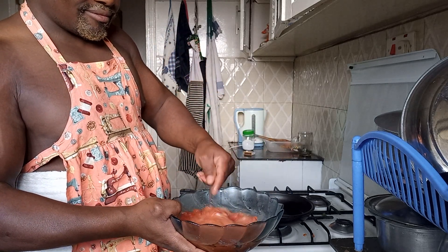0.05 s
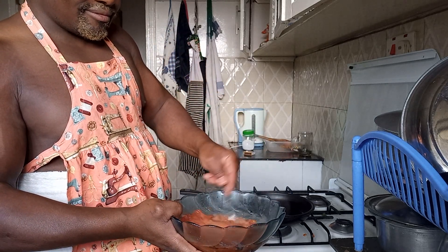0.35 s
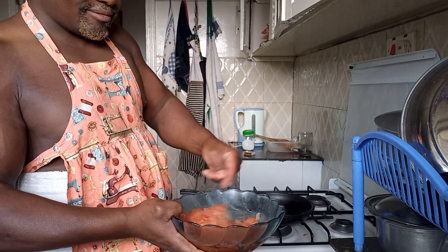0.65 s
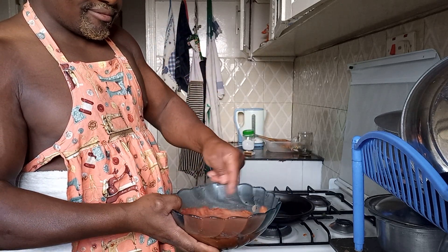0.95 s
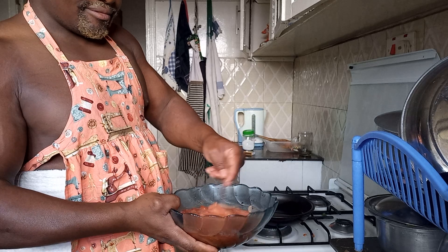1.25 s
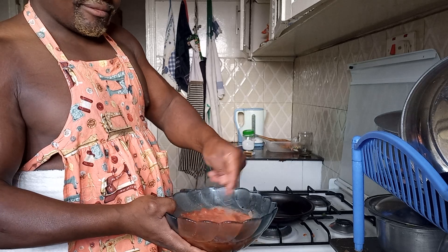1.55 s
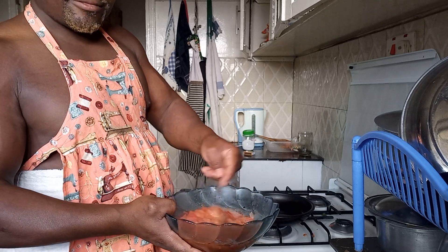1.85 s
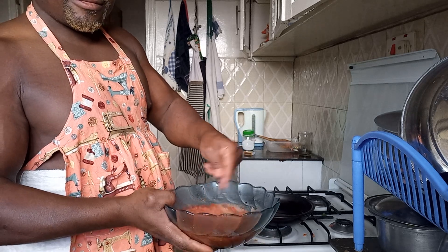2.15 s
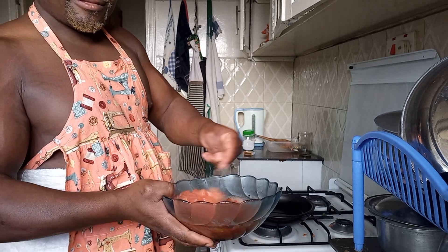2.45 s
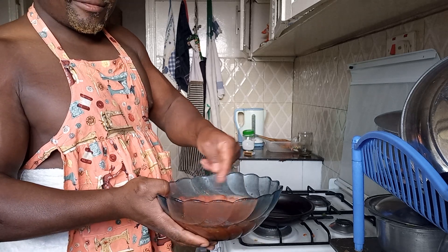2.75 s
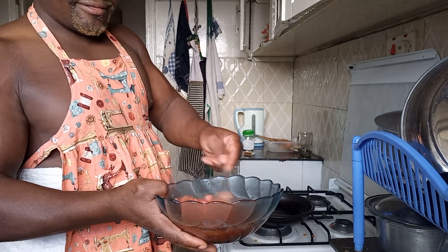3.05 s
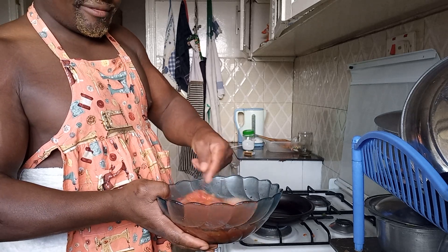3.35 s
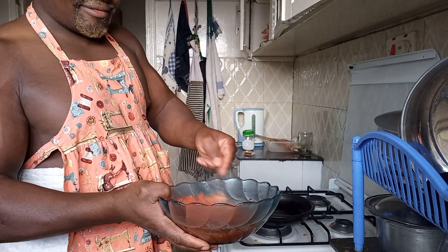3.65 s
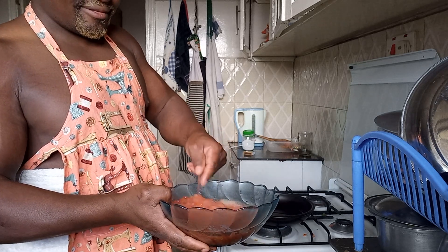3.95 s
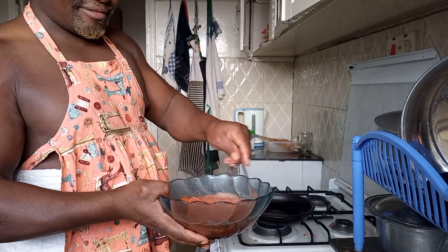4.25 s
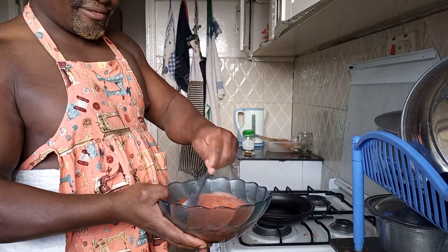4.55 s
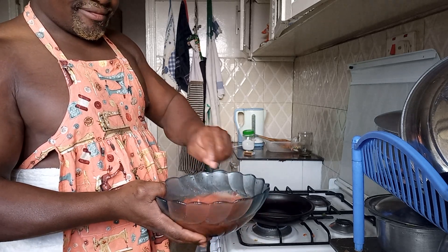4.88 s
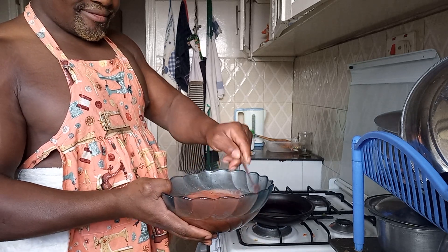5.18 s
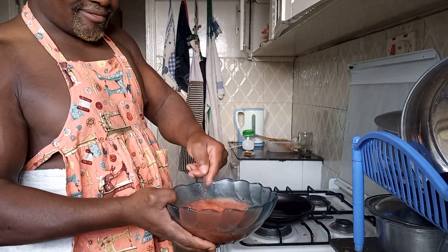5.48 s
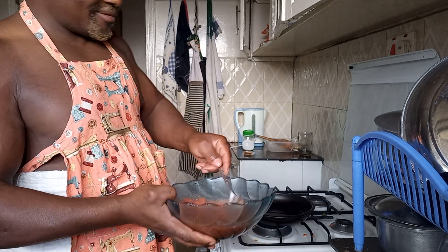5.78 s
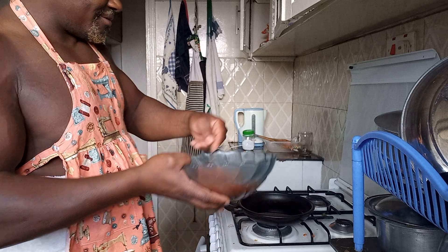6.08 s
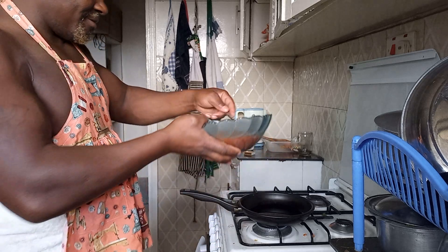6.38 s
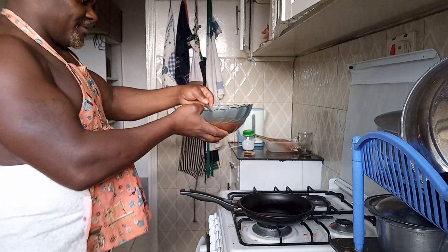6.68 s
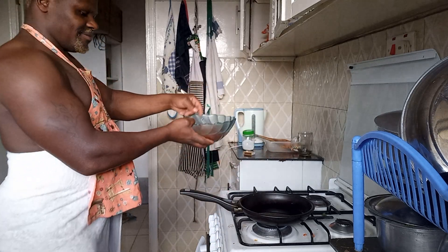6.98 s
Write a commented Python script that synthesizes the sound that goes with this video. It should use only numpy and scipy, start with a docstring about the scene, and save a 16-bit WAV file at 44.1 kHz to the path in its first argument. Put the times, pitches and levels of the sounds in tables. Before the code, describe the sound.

Quick, rhythmic squelches and hollow plops come from eggs and tomato being whisked in a glass bowl a short distance from the microphone. Small bubbles pop between strokes and the metal utensil now and then ticks against the glass. A little past halfway the whisking gives way to a soft bump, one bright clink and some gentle, irregular stirring. The small kitchen adds a short echo and a faint hum.

```python
"""A small tiled kitchen with a faint hum; a stereo microphone a little way from a hand-held glass bowl.
From the start a steel utensil beats eggs and chopped tomato, about five strokes a second. Each stroke
swishes through the egg and slaps an air pocket shut; bubbles pop after it, and now and then steel
clinks on glass. After four seconds the beating stops, there is a soft low bump and a bright clink,
and a few slower stirs follow. The tiles answer throughout."""
import sys
import numpy as np
from scipy import signal
from scipy.fft import rfft, irfft, next_fast_len
from scipy.io import wavfile

SR = 44100
rng = np.random.default_rng(int(sys.argv[2]) if len(sys.argv) > 2 else 0)


def waveform_to_disk(signal):
    """Save audio, clipped to [-1, 1], as 16-bit WAV at the path in sys.argv[1]."""
    frames = np.transpose(np.atleast_2d(signal))
    scaled = np.clip(frames, -1, 1) * 32767
    samples = np.round(scaled).astype(np.int16)
    wavfile.write(sys.argv[1], SR, samples)


N = 314256
LENGTH = 16384  # samples in one short sound with its room tail
T, HZ = np.arange(LENGTH) / SR, np.fft.rfftfreq(LENGTH, 1 / SR)
BEATING_ENDS_S = 4.2

# Strokes through the egg. Each row: start in seconds, plop level in dB, air pocket pitch and width in Hz,
# squelch pitch in Hz, squelch in dB over the smack, smack level in dB, spray level in dB.
STROKES = [(0.0, -45.5, 855, 450, 1940, -13, -53, -59), (0.11, -44, 590, 313, 6300, -6, -48, -52),
           (0.29, -32, 890, 396, 1990, -7, -39, -43), (0.463, -34, 1110, 420, 2420, -30, -47.5, -47),
           (0.65, -45, 905, 560, 4930, -12, -44.5, -47), (0.853, -39.5, 710, 132, 2340, 2, -45, -52.5),
           (1.053, -47, 850, 157, 4340, -6, -55, -59), (1.419, -44, 804, 210, 6160, -4.5, -52.5, -55.5),
           (1.651, -40.5, 547, 180, 1950, -5.5, -44, -47), (1.849, -33.5, 834, 290, 4080, -3, -49, -55),
           (2.045, -30, 724, 250, 6300, -5, -45, -48), (2.258, -38.5, 823, 129, 2390, 3, -48, -54.5),
           (2.438, -28.5, 710, 90, 3090, -21, -42.5, -45), (2.654, -40.5, 766, 218, 2870, -5, -53, -54),
           (2.838, -39, 802, 260, 3050, -3, -45.5, -52.5), (3.027, -40, 935, 218, 2400, -16, -49.5, -56),
           (3.214, -35.5, 1020, 290, 2370, -3.5, -45, -51), (3.412, -36, 1010, 237, 5170, -18, -45, -50),
           (3.61, -34, 875, 175, 2830, -6, -48, -57), (3.822, -46.5, 825, 253, 3610, -28, -53.5, -63.5),
           (4.007, -37, 823, 169, 2120, -26, -48, -56), (4.988, -46, 762, 458, 6200, -8.5, -48, -53),
           (5.49, -51.5, 610, 513, 2340, -20, -59.5, -64.5),
           (5.554, -45.5, 700, 230, 2420, -4.5, -51, -56.5), (5.924, -45.5, 810, 473, 3030, 4, -51, -54),
           (6.107, -49, 870, 440, 6800, -4.5, -54, -60.5),
           (6.523, -50.5, 740, 505, 4880, -13, -51.5, -52.5),
           (6.728, -53.5, 730, 330, 6000, -17, -60.5, -82),
           (6.898, -54.5, 1030, 450, 5900, -5, -45.5, -46.5), (6.926, -44.5, 930, 170, 5950, -20, -46, -54)]
# Tone of the wet smack and of the fine spray. Each row: frequency in Hz, gain in dB.
SMACK_COLOUR = [(900, -14.5), (1500, 3.5), (2200, -0.5), (3300, -3.5), (5500, -1), (7000, -9.5),
                (9000, -22)]
SPRAY_COLOUR = [(5000, -33.5), (7000, -5), (9000, -5), (12000, -1.5), (14500, -4.5), (16000, -11.5)]


def strokes():
    """The utensil cuts into the egg: the wet film squelches and sprays, and an air pocket plops."""
    # Hollow ringing tones of bowl and nearby tiles that colour each plop.
    # Each row: pitch in Hz, width in Hz, gain in dB.
    hollow_tones = [(623.5, 3.2, 8), (712.6, 6.5, 6.5), (872, 52, -4), (1320, 78, -1), (1393, 100, 4)]
    out = np.zeros((2, N))
    smack, spray = causal(SMACK_COLOUR), causal(SPRAY_COLOUR)
    body = causal([(100, -24.5), (250, -10.5), (450, 5.5), (1200, 1.5), (1800, -11.5), (4000, 1),
                   (9000, -34)])
    body *= 1 + sum(amp(db) * resonance(hz, width) for hz, width, db in hollow_tones)
    closing = delay(0.001471)  # the pocket shuts just after the smack
    for s, plop_db, hz, width, squelch_hz, squelch_db, smack_db, spray_db in STROKES:
        slap = closing + 0.5 * crackle(np.exp(-T / 0.0075), rate=760, spread_db=3.5)
        plop = irfft(slap * resonance(hz, width) * body * kitchen(direct_db=-7))
        cut = (1 - np.exp(-T / 0.00088)) * np.exp(-T / 0.005)
        tearing = film(cut, rate=2000, direct_db=-8) + 0.5 * closing * kitchen(direct_db=-4)
        # folds of egg trap a small cavity that colours each smack differently
        squelch = unit(irfft(tearing * resonance(squelch_hz, 0.4 * squelch_hz) ** 2))
        wet = unit(irfft(tearing * smack)) + amp(squelch_db) * squelch
        for sound, db in ((plop, plop_db), (wet, smack_db), (irfft(tearing * spray), spray_db)):
            add(out, s, amp(db) * unit(sound, seconds=0.05))
    return out


def swishes():
    """Dragging tears the egg film in fine crackles: lightly before fast strokes, now and then hard."""
    # Each row: start and length in seconds, smack level in dB, spray level in dB.
    hard_drags = [(0.246, 0.0048, -61, -49.5), (0.426, 0.013, -52, -48), (0.589, .029, -51, -56),
                  (0.981, 0.05, -54, -59.5), (1.168, 0.029, -62, -69), (2.008, 0.023, -63, -52.5),
                  (2.361, 0.051, -56, -81), (2.45, .0033, -48, -66), (2.594, 0.0043, -48.5, -55),
                  (2.78, 0.035, -61.5, -64.5), (3.172, 0.012, -55.5, -56.5), (3.56, 0.024, -43, -46),
                  (3.702, .008, -60, -61.5), (3.765, 0.0092, -54.5, -54.5), (3.946, 0.014, -68.5, -61.5),
                  (4.418, 0.018, -57, -62), (4.465, 0.0075, -61, -51.5), (4.64, 0.015, -67.5, -68),
                  (5.68, 0.061, -65, -71.5), (5.969, 0.056, -58.5, -67), (6.166, .11, -63, -70),
                  (6.467, 0.074, -75, -71), (6.822, 0.046, -55.5, -59.5)]
    out = np.zeros((2, N))
    smack, spray = causal(SMACK_COLOUR), causal(SPRAY_COLOUR)
    lead_s, dip_s = 0.047, 0.036  # the utensil dips in ahead of the stroke
    dips = [(s - lead_s, dip_s, smack_db - 19.5, spray_db - 18.5)
            for s, *_, smack_db, spray_db in STROKES if lead_s < s < BEATING_ENDS_S]
    for s, length, smack_db, spray_db in hard_drags + dips:
        drag = np.exp(-np.maximum(T - length, 0) / 0.0065)
        tearing = film(drag, rate=1200, direct_db=-3, count=2)
        tearing += 0.2 * kitchen(direct_db=-11)  # a tick as the steel bites
        for colour, db in ((smack, smack_db), (spray, spray_db)):
            add(out, s, amp(db) * unit(irfft(tearing * colour), seconds=max(length, 0.008)))
    return out


def film(envelope, rate, direct_db, count=3):
    """Spectrum of egg film tearing at several places, each with its own path to the microphone."""
    tears = (crackle(envelope, rate / count, spread_db=2) * kitchen(direct_db) for _ in range(count))
    return sum(tears) / np.sqrt(count)


def crackle(envelope, rate, spread_db):
    """Spectrum of tiny bursts of uneven size, rate a second, under an envelope."""
    present = rng.random(LENGTH) < rate / SR
    sizes = rng.choice([-1, 1], LENGTH) * amp(spread_db * np.clip(rng.standard_normal(LENGTH), -2, 2))
    bursts = present * sizes * envelope
    return rfft(bursts / (np.linalg.norm(bursts) + 1e-12))


def bubbles():
    """Bubbles and drops ring; froth bursts after each stroke, and fast ones gulp as the furrow closes."""
    # The loudest pops. Each row: start in seconds, relative level in dB, pitch in Hz, life in cycles.
    single_pops = [(0.124, -41, 468, 7.4), (0.302, -39.5, 427, 2.6), (0.5015, -31.5, 870, 2.1),
                   (0.503, -42, 2220, 2.5), (0.548, -43.5, 912, 2.5), (0.602, -40.5, 750, 1),
                   (0.731, -39.5, 844, 9.9), (0.888, -41, 780, 6.6), (0.989, -37.5, 1356, 4.2),
                   (1.13, -49.5, 1290, 3.4), (1.169, -49, 1336, 12), (1.188, -46.5, 500, 7.2),
                   (1.258, -49.5, 1330, 3.5), (1.32, -50, 1350, 4.9), (1.384, -47.5, 522, 4.2),
                   (1.7, -42.5, 910, 1), (1.891, -35, 990, 5.1), (2.064, -25.5, 900, 2.4),
                   (2.453, -37.5, 2990, 2.3), (2.688, -39.5, 860, 2.3), (3.397, -47, 2000, 16),
                   (3.622, -44, 350, 2.6), (3.676, -39, 1090, 0.61), (3.772, -48, 3530, 9.8),
                   (3.807, -50.5, 3130, 5.3), (4.039, -47, 2110, 5.8), (4.071, -46, 1290, 2.7),
                   (4.419, -57.5, 777, 6.9), (5.362, -53, 990, 0.82), (5.73, -45, 619, 8),
                   (6.002, -50, 2850, 3.4), (6.986, -41, 1230, 0.45)]
    out = np.zeros((2, N))
    gulp_hz, gulp_cycles, typical_plop_db = 412, 2.44, -34
    gulps = [(s + 0.016, -50 + 0.17 * (plop_db - typical_plop_db), gulp_hz, gulp_cycles)
             for s, plop_db, *_ in STROKES if s < BEATING_ENDS_S]
    froth_lag_s, froth_hz, froth_cycles = 0.044, 2250, 12
    scatter = rng.uniform(-1, 1, (len(STROKES), 2))
    froth = [(s + froth_lag_s * (1 + wait / 2), smack_db - 9, froth_hz * np.exp(0.57 * pitch),
              froth_cycles) for (s, *_, smack_db, _), (wait, pitch) in zip(STROKES, scatter)]
    for s, db, hz, cycles in single_pops + gulps + froth:
        soft = resonance(hz, 0.97 * hz)  # thick egg rounds off the start of the pop
        pop = irfft(rfft(bubble(T, hz, max(cycles, 1), rise=0.04)) * soft * kitchen(direct_db=-4))
        add(out, s, amp(db - 3.5) * unit(pop, seconds=0.025))
    return out


def bubble(t, hz, cycles, rise):
    """An air pocket rings briefly; its pitch climbs as it nears the surface."""
    age = t * hz / cycles
    glide = 1 + rise * (np.minimum(age, 2) - 1)
    return np.sin(2 * np.pi * hz * t * glide) * np.exp(-2 * age) * (1 - np.exp(-2 * t * hz))


def slosh(count=1100):
    """Many small pockets gurgle as the egg runs back down the glass."""
    # Course of the gurgle. Each row: time in seconds, relative level in dB, typical pitch in Hz.
    gurgle_course = [(0.0, -42.5, 865), (0.22, -58, 470), (0.26, -57, 1010), (0.36, -45, 748),
                     (0.5, -47.5, 954), (0.93, -54, 690), (0.99, -44, 1330), (1.23, -59.5, 585),
                     (1.27, -52, 1020), (1.76, -61, 560), (1.82, -54, 850), (2.5, -51.5, 710),
                     (3.14, -57, 910), (3.67, -45, 910), (4.23, -78, 657), (5.77, -61, 648),
                     (6.23, -73, 880), (6.35, -74, 507), (6.99, -53, 998), (7.13, -63, 693)]
    times, level_db, centre_hz = np.transpose(gurgle_course)
    pops = np.zeros(N)
    scatter = np.clip(rng.standard_normal((count, 3)), -1.6, 1.8)
    for s, (pitch, size, late) in zip(np.linspace(0, N / SR, count), scatter):
        hz = np.interp(s, times, centre_hz) * np.exp(0.33 * pitch)
        add(pops, s + 0.0074 * late, amp(3.4 * size) * bubble(T[:2000], hz, cycles=4, rise=0.036))
    in_room = signal.fftconvolve(pops[None], irfft(kitchen(direct_db=-8)), axes=1)[:, :N]
    return unit(in_room) * amp(np.interp(np.arange(N) / SR, times, level_db) - 5)


def clinks():
    """Steel chatters on the glass; the ring of the utensil builds over the first contacts."""
    # Each row: start in seconds, relative levels of utensil and glass in dB.
    contacts = [(0.294, -53, -50), (0.651, -50, -44.5), (3.414, -47, -46.5), (4.472, -56, -70),
                (5.277, -36, -83), (5.921, -65, -76), (6.837, -53.5, -61)]
    # Ring of utensil and bowl. Each row: pitch in Hz, relative level in dB, seconds to fall 60 dB.
    steel_modes = [(1835, -7.5, 0.15), (1836, -13, .12), (2796, 2, 0.055), (3210, -15, 0.071),
                   (3880, 10.5, 0.02), (4700, -3, 0.055), (6160, 1, 0.094), (6470, 5, 0.029),
                   (6760, 2.5, 0.055), (8700, -3, 0.055), (9050, -6, .06), (10400, -18, 0.072),
                   (11910, -3, 0.11), (14000, 1, 0.047), (14110, 3, .08), (13100, 2.5, 0.062),
                   (14740, -2, .05), (15510, -2, .05)]
    glass_modes = [(3340, -17, 0.031), (3924, -11.5, 0.22), (5200, -3, .06), (5190, 1.5, 0.027),
                   (11420, -13, 0.03)]
    out = np.zeros((2, N))
    bright = causal([(500, -14.5), (1500, -7.5), (2200, -10.5), (3000, -4.5), (6500, -5), (8000, -13.5),
                     (11000, -3), (14300, -4), (16000, -5.5)])
    build = 1 - np.exp(-T / 0.002)
    for s, steel_db, glass_db in contacts:
        room = kitchen(direct_db=-8)
        chatter = crackle(build * np.exp(-T / 0.012), rate=2000, spread_db=4) * bright
        steel = rfft(build * ring(steel_modes))
        glass = rfft(ring(glass_modes))
        for spectrum, db in ((chatter, steel_db - 4.5), (steel, steel_db - 4.5), (glass, glass_db)):
            add(out, s, amp(db) * unit(irfft(spectrum * room), seconds=0.05))
    return out


def ring(modes):
    """Decaying modes, at new strengths for each blow."""
    return sum(amp(db + rng.normal(0, 0.54) - 60 * T / t60) * np.sin(2 * np.pi * hz * T)
               for hz, db, t60 in modes)


def thud():
    """A soft low bump, followed by a short boom."""
    out = np.zeros((2, N))
    bump = irfft(rfft(bubble(T, hz=99, cycles=2.5, rise=0.027)) * kitchen(direct_db=1))
    boom = np.sin(2 * np.pi * 88 * T) * np.exp(-((T - 0.16) / 0.075) ** 2)
    add(out, 4.643, amp(-56) * unit(bump, seconds=0.05) + amp(-59.5) * boom)
    return out


def kitchen(direct_db):
    """Response from bowl to microphone: direct path, a strong echo off the near tiles, a dense tail."""
    # Each row: frequency in Hz, seconds for the tail to fall 60 dB.
    decay_times = [(200, 0.51), (550, 0.34), (1400, 0.3), (3700, 0.32), (10000, 0.27), (16000, 0.25)]
    # Each row: frequency in Hz, left-right correlation of the tail.
    tail_likeness = [(100, 0.27), (300, 0.73), (700, 0.37), (1500, -0.02), (4000, -0.019), (12000, -0.21)]
    hz, t, bands = signal.stft(irfft(stereo_noise(tail_likeness, LENGTH)), SR, nperseg=256)
    decay = amp(-60 * t / along(decay_times, hz)[:, None])
    tail = signal.istft(bands * decay, SR, nperseg=256)[1][:, :LENGTH]
    tail *= 1 - np.exp(-T / 0.00077)
    skew_s = np.array([[-1], [1]]) / SR  # the left side tends to hear the bowl first
    direct = delay(8 / SR + skew_s * rng.normal(0.28, 0.34))
    echo = delay(0.0062 + rng.normal(0, 0.0001) - 2.04 * skew_s) / (1 + 1j * HZ / 6000)
    return rfft(tail) / np.linalg.norm(tail[0]) + amp(direct_db) * (direct + echo)


def room_tone():
    """Steady room noise with a low hum in it."""
    # Each row: frequency in Hz, gain of the noise in dB.
    air_colour = [(20, -28.5), (40, -42), (60, -15), (85, -10), (120, -14), (170, -26.5), (300, -15),
                  (420, -20), (580, -12), (800, -32), (1500, -34), (4000, -42.5), (16000, -42.5)]
    # Each row: frequency in Hz, left-right correlation of the noise.
    air_likeness = [(60, 0.77), (300, 0.73), (700, 0.29), (2000, 0.068)]
    colour = amp(along(air_colour, np.fft.rfftfreq(N, 1 / SR)))
    air = unit(irfft(stereo_noise(air_likeness, N) * colour, N))
    hum = np.sin(2 * np.pi * 88 * np.arange(N) / SR)
    return amp(-67.5) * air + amp(-77.5) * hum


def stereo_noise(likeness, size):
    """Spectra of two white noises that are partly alike."""
    turn = np.arccos(np.clip(along(likeness, np.fft.rfftfreq(size, 1 / SR)), -1, 1)) / 2
    mid, side = rfft(rng.standard_normal((2, size))) * [np.cos(turn), np.sin(turn)]
    return np.array([mid + side, mid - side])


def resonance(hz, width):
    """Response of one damped resonance."""
    return 1j * HZ * width / (hz * hz - HZ ** 2 + 1j * HZ * width)


def delay(seconds):
    """Response of a late arrival."""
    return np.exp(-2j * np.pi * HZ * seconds)


def causal(points):
    """Minimum-phase response with the given (Hz, dB) colour."""
    cepstrum = irfft(np.log(amp(along(points, HZ))))
    cepstrum[1:LENGTH // 2] *= 2
    cepstrum[LENGTH // 2 + 1:] = 0
    return np.exp(rfft(cepstrum))


def along(points, hz):
    """Interpolate (Hz, value) points on a log axis."""
    frequencies, values = np.transpose(points)
    return np.interp(np.log(hz + 1), np.log(frequencies), values)


def amp(db):
    """Decibels to gain."""
    return 10 ** (np.asarray(db) / 20)


def unit(x, seconds=None):
    """Scale to rms 1, over the first seconds if given."""
    head = x if seconds is None else x[..., :max(8, int(seconds * SR))]
    return x / np.sqrt(np.mean(head ** 2) + 1e-20)


def add(track, s, sound):
    """Mix a sound in at s seconds."""
    start = min(max(0, round(s * SR)), N - 1)
    track[..., start:start + sound.shape[-1]] += sound[..., :N - start]


def scene():
    """The bowl, a touch left of centre, over the bump and the room tone."""
    bowl = strokes() + swishes() + bubbles() + slosh() + clinks()
    return bowl * amp([[0.3], [-0.3]]) + thud() + room_tone()


def record(dry):
    """The microphone loses the deepest bass and keeps nothing above its band limit."""
    bottom_hz, top_hz = 42, 15900
    size = next_fast_len(N + SR // 4)
    low_cut = signal.sosfilt(signal.butter(2, bottom_hz, "highpass", fs=SR, output="sos"), dry)
    band_limit = 1 / (1 + (np.fft.rfftfreq(size, 1 / SR) / top_hz) ** 160)
    return irfft(rfft(low_cut, size) * band_limit, size)[:, :N]


dry = scene()
out = record(dry)
waveform_to_disk(out)
```